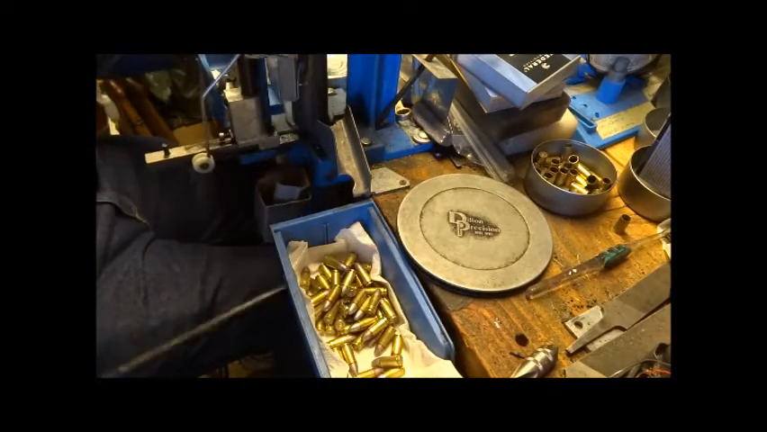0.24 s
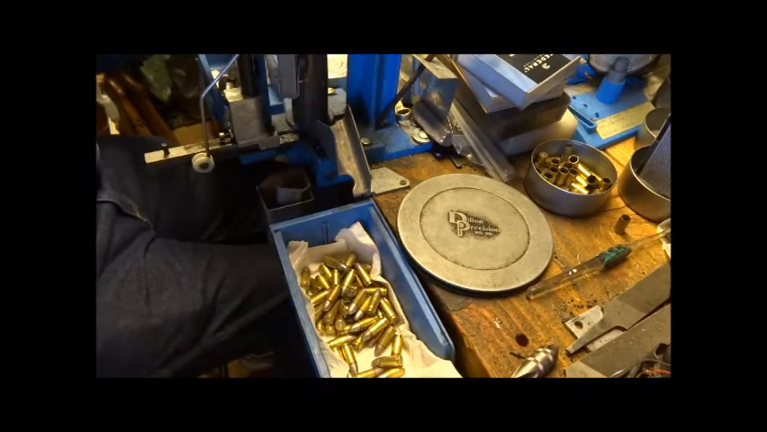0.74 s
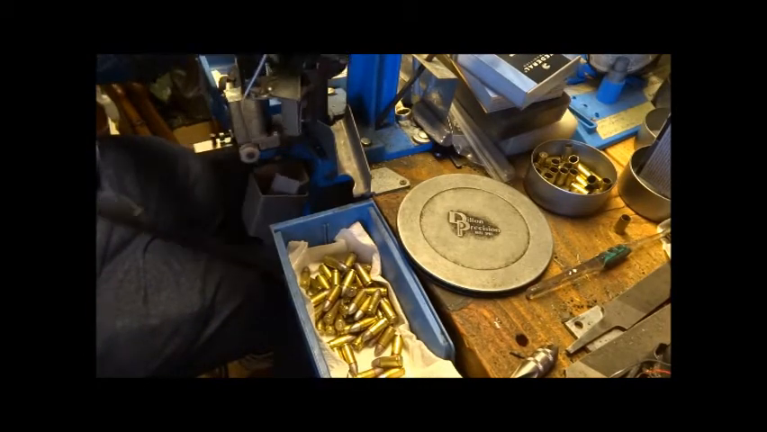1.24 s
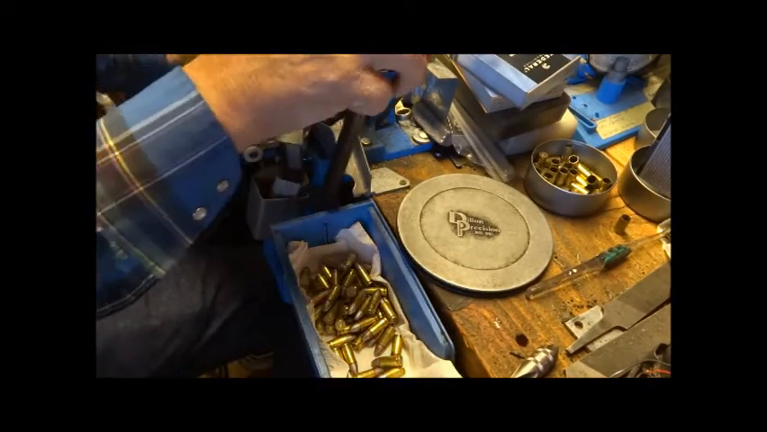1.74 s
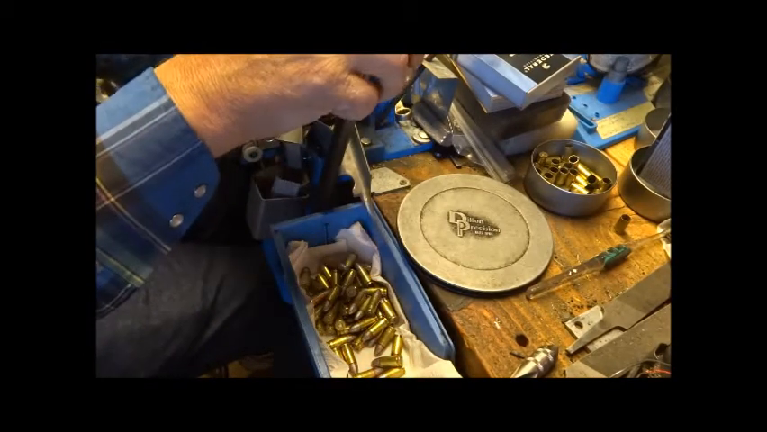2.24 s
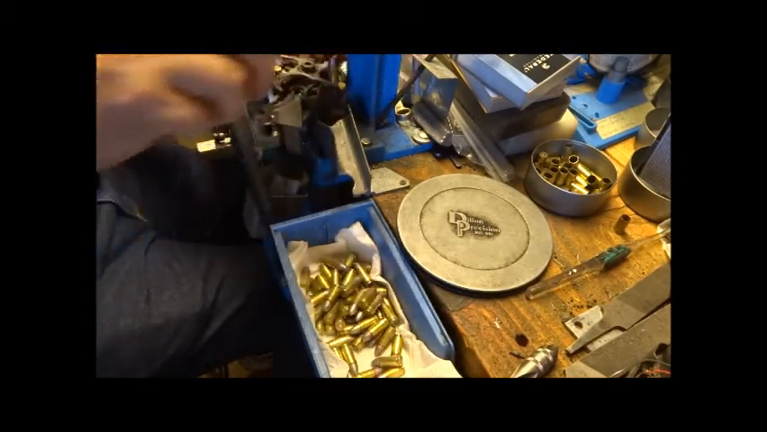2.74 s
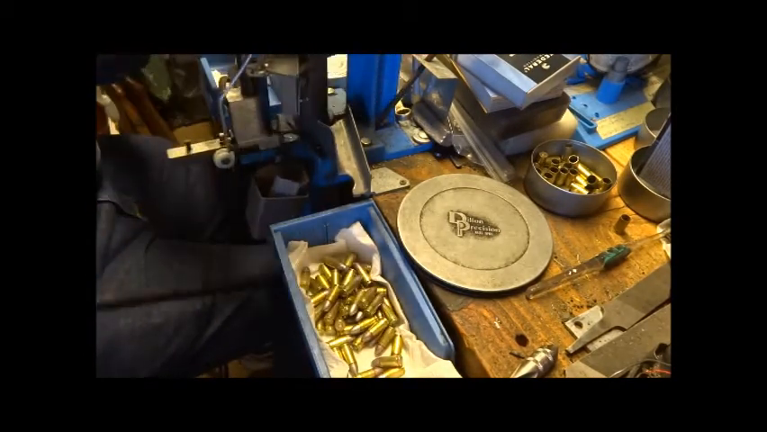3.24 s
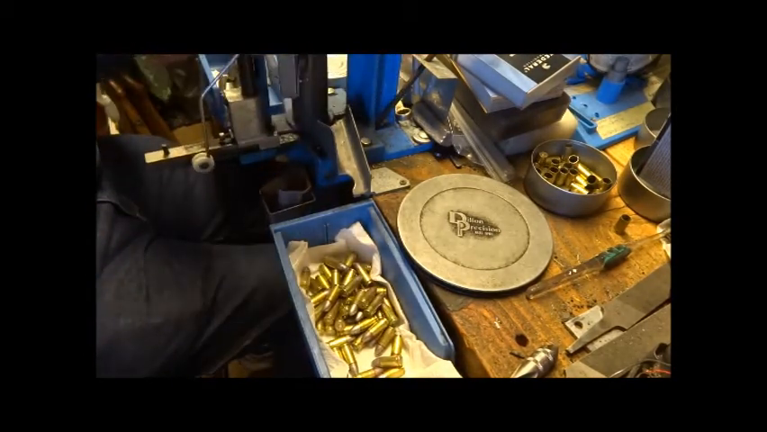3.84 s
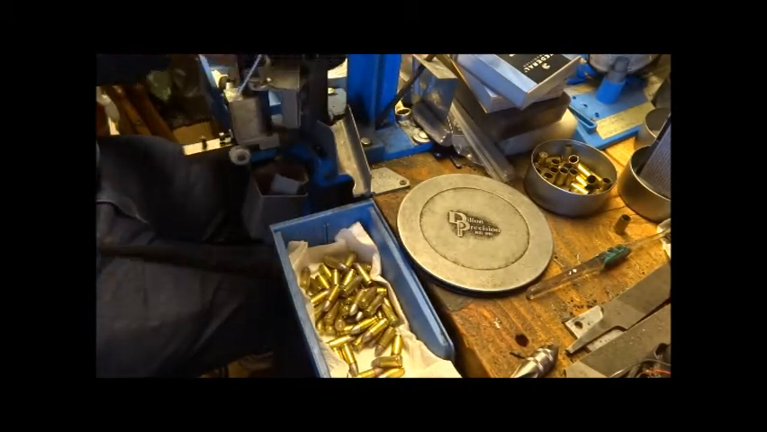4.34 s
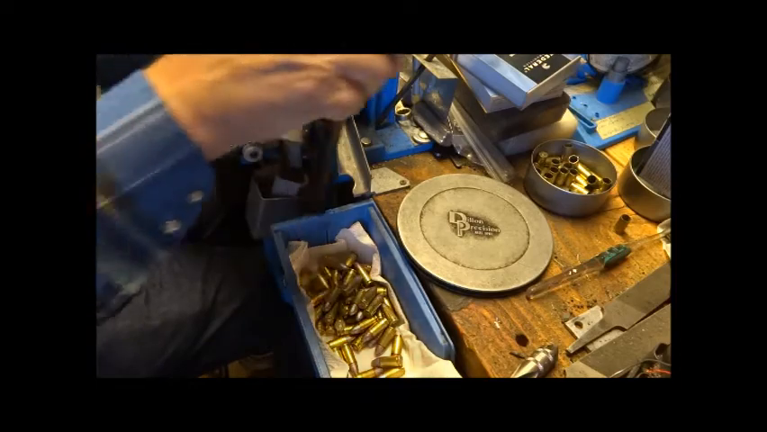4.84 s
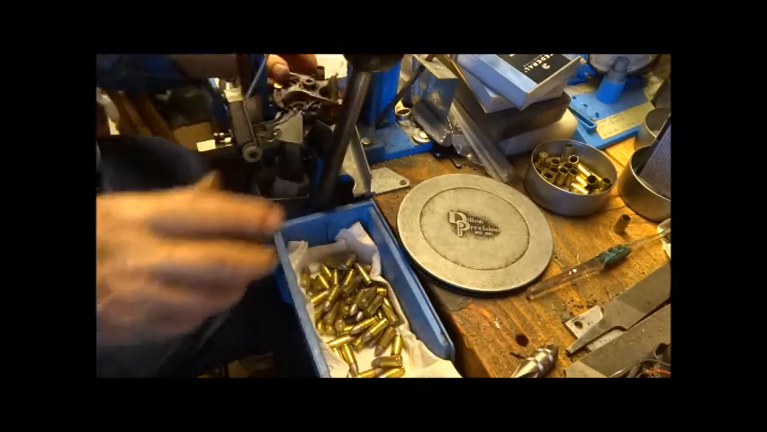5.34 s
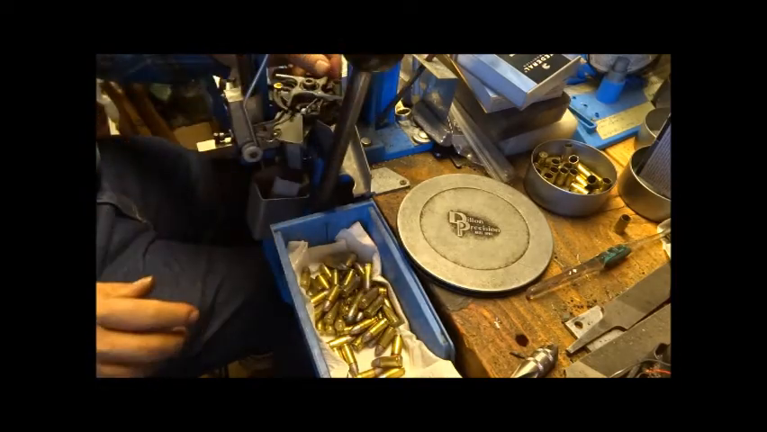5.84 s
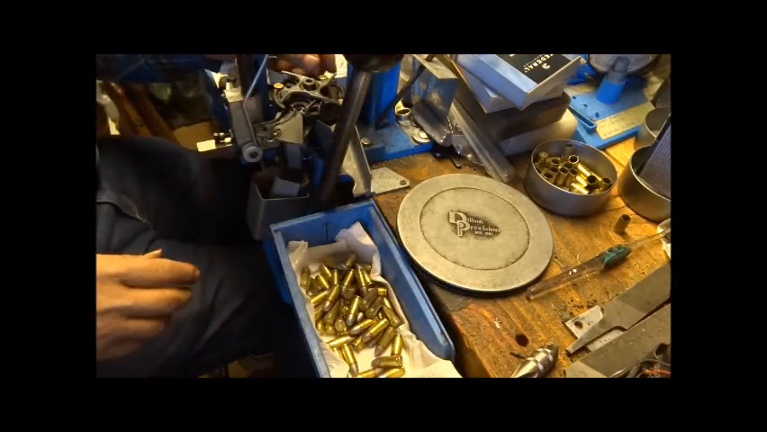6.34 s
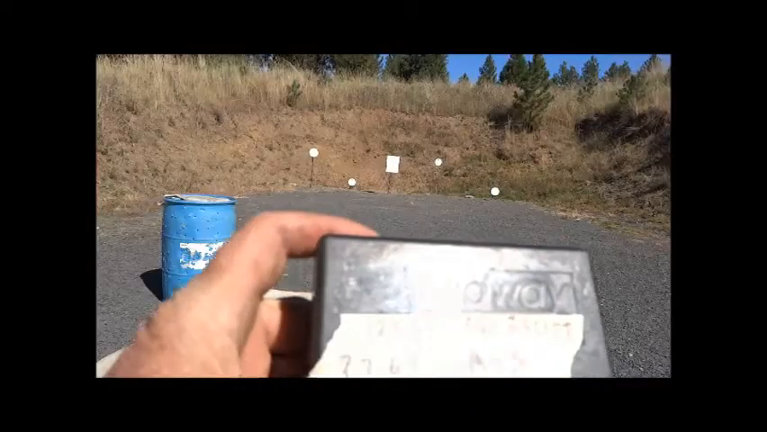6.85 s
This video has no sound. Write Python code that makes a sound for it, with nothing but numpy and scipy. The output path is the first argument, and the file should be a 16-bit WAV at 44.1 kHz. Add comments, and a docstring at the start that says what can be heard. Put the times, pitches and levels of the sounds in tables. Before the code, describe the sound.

A nearby stereo microphone catches a lever press at work: busy metallic knocks and rasping slides first, a sharp snap, small handling clicks, then a bright brass clatter with hollow bin knocks. After a lull, two heavier stroke clusters and a second snap lead to another cartridge drop. Faint indoor hiss and short wall reflections surround it, abruptly replaced by fading quiet open air.

```python
"""A hand press is worked at a wooden bench, close up: steel parts knock and click as noise bursts and dying
sines, the ram slides as gritty noise and sings through gliding resonances, and the bench thumps.
Twice a finished brass round tumbles ringing down a chute and drums on a hollow bin, each a bank of modes.
A faint shaped room hiss lies under the bench; at the end the scene changes to quiet open air, a fading hiss."""
import sys
import numpy as np
from scipy import signal
from scipy.fft import rfft, irfft
from scipy.io import wavfile
from scipy.ndimage import uniform_filter1d

SR = 44100
rng = np.random.default_rng(int(sys.argv[2]) if len(sys.argv) > 2 else 0)


def bounce(signal):
    """Save signal as a 16-bit WAV file at the path given by the first command-line argument."""
    frames = np.transpose(np.atleast_2d(signal))
    limited = np.clip(frames, -1, 1)
    pcm = np.round(limited * 32767).astype(np.int16)
    wavfile.write(sys.argv[1], SR, pcm)


def decibels_to_gain(level_db):
    """Convert a level in decibels to a linear amplitude gain (20 dB per decade)."""
    exponent = np.asarray(level_db, float) / 20
    return 10 ** exponent


N = 313551

# open air spectrum: (frequency [Hz], relative level [dB])
AIR_COLOUR = [(40, -29), (1060, -11.5), (1510, -18), (1840, -5), (2620, -14), (14900, -22), (16500, -12)]
# resonances in the air and room hiss: (frequency [Hz], width [Hz], level before a common offset [dB])
AIR_RESONANCES = [(2410, 81, -2)]
ROOM_RESONANCES = [(361, 44, 3), (958, 70, 3), (2270, 110, 3), (3810, 150, 4)]
# room hiss spectrum: (frequency [Hz], relative level [dB])
ROOM_COLOUR = [(30, -10.5), (120, -0.5), (300, -5.5), (700, 3), (1300, -6), (2600, -4), (4500, -7),
               (9000, -8.5), (15000, -9), (16500, -33.5)]
AIR_START_S = 6.668
# decay of the wall reflections: (frequency [Hz], t60 [s])
WALL_DECAY = [(150, 0.13), (1000, 0.09), (4000, 0.06), (14000, 0.03)]
# side gain of the bench sounds, then of the hisses: (frequency [Hz], gain [dB])
BENCH_SIDE = [(60, -18), (180, -25), (700, -21), (3000, -15), (6000, -16), (15000, -22)]
HISS_SIDE = [(100, -12), (400, -2), (1500, 1.5), (5000, -6), (15000, -7.5)]
# microphone response: (frequency [Hz], gain [dB])
MICROPHONE_COLOUR = [(30, -18), (110, -6), (200, 0), (12000, 0), (15500, -6), (17000, -28)]

# the sliding ram sings, its pitch moving as the free length changes:
# (start [s], end [s], first pitch [Hz], last pitch [Hz], level [dB])
RAM_WHINES = [(.14, 0.253, 5000, 6100, -43.5), (.29, 0.439, 6550, 6300, -38), (.11, .28, 4050, 3800, -48),
              (.3, 0.404, 14200, 13000, -30.5), (0.883, 1.048, 7600, 5800, -41.5)]
# slides of ram and cases, swelling toward the stop:
# (start [s], loudest [s], end [s], scrape level [dB], rumble relative to scrape [dB])
SLIDE_STROKES = [(-.05, 0.052, 0.16, -34.5, 0.5), (0.137, 0.378, 0.52, -31, -11.5),
                 (0.598, 0.665, 1.03, -53.5, 13), (0.927, 1.12, 1.24, -28, -13.5),
                 (3.54, 3.623, 3.82, -41.5, -6.5), (3.82, 3.897, 4, -54.5, 12),
                 (4.093, 4.13, 4.38, -38, -21.5), (4.203, 4.395, 4.62, -45.5, -4)]
# steady rubbing while a hand rests on the lever or moves cases: (start [s], end [s], level [dB])
HAND_RUBS = [(0.494, 1.802, -55), (2.042, 2.202, -53.5), (3.013, 4.08, -57), (4.483, 5.908, -55.5)]
# scrape and rumble spectra: (frequency [Hz], relative level [dB])
SCRAPE_COLOUR = [(880, -48), (1500, -27.5), (2430, -4), (5700, -1), (13400, -0.5), (15500, -4),
                 (16500, -28)]
BENCH_RUMBLE_COLOUR = [(60, -26), (150, -5.5), (500, -3), (1100, -6.5), (2500, -6.5), (5000, -23.5)]

# the lever loads the bench: (time [s], level [dB])
LEVER_THUMPS = [(0.041, -29), (0.263, -34), (0.354, -30), (0.591, -24), (0.712, -29.5), (0.855, -31.5),
                (0.905, -38), (1.056, -26.5), (1.107, -29.5), (1.175, -26), (1.78, -30.5), (1.981, -43),
                (2.06, -38.5), (2.377, -36), (3.732, -40.5), (3.546, -25), (3.818, -27), (3.937, -32),
                (4.02, -38), (4.085, -33), (4.188, -23.5), (5.006, -27), (5.114, -31.5), (5.134, -28),
                (5.21, -43), (5.562, -45)]
# deep modes of the bench top: (frequency [Hz], level [dB], t60 [s])
BENCH_TOP_MODES = [(182, -12.5, 0.24), (209, -6, 0.069), (303, -4.5, 0.03), (378.8, -7, 0.13)]
# modes of the press frame: (frequency [Hz], level [dB], t60 [s])
FRAME_MODES = [(418, -19, 0.044), (528.6, -0.5, 0.1), (637, 14, 0.058), (843, 7.5, 0.084),
               (1038.6, 12, 0.039), (1315, 8, 0.035)]

# the round drums on the bin: (time [s], level [dB])
BIN_LANDINGS = [(2.278, -11.5), (2.339, -18), (2.3762, -0.5), (2.396, -5), (2.453, -14), (5.788, -22.5),
                (5.826, -18.5), (5.8948, -2), (5.955, -13.5), (6.015, -23.5), (6.04, -25.5)]
# modes of the hollow bin: (frequency [Hz], level before dulling [dB], t60 [s])
BIN_MODES = [(505, -11, 0.05), (640, -1, 0.04), (790, -16, .08), (1030, 5, 0.03), (1135, 1, 0.03)]
# bounces of the falling round: (time [s], level [dB], tilt toward the high modes [dB per octave])
ROUND_BOUNCES = [(2.269, -22.5, 1.5), (2.279, -13, -5), (2.308, -18.5, -1), (2.339, -19, -5),
                 (5.7769, -18, 4), (5.79, -19, 4.5), (5.823, -22.5, 1.5), (5.8384, -29.5, 5.5),
                 (5.8463, -25, -4.5)]
# modes of the brass round: (frequency [Hz], level before tilt [dB], t60 [s])
BRASS_MODES = [(2090, -5, .07), (3615, -6, .13), (3920, -8, .08), (5558, -7, .08), (5592, -3, .1),
               (6300, -9, .07), (8100, -12, .05), (9960, -7, .12), (10070, -8, .12), (11200, -4, .07),
               (11760, -4, .09), (14460, -4, .1)]

# a tiny steel part's single mode: (frequency [Hz], level [dB], t60 [s])
PING_MODES = [(11250, -18, .07)]
# modes of a light loose part: (frequency [Hz], level [dB], t60 [s])
LOOSE_MODES = [(1780, -9.5, 0.22), (2640, -9.5, 0.07), (3060, -1, 0.081), (3500, -7, 0.088),
               (4470, -10, 0.096), (6100, -1.5, 0.054), (6600, -7, 0.035)]
# taps on the loose part: (time [s], level [dB])
LOOSE_PART_TAPS = [(.703, -45), (0.733, -31), (0.752, -47), (.772, -33), (.849, -47)]
# modes of the turning plate: (frequency [Hz], level before tilt [dB], t60 [s])
PLATE_MODES = [(823, -2, 0.044), (1084, -5, 0.046), (1520, -2, 0.04), (1758, -9, 0.09),
               (2130, -12.5, 0.092), (3380, -3.5, 0.054), (4040, -8, 0.038)]
# the plate snaps into place and rebounds: (time [s], level [dB], tilt toward the high modes [dB per octave])
SNAPS = [(1.394, -10.5, -8.5), (1.451, -32, 15.5), (4.568, -11, -2), (4.629, -34, 15)]
# the round hits chute, bin and other rounds:
# (time [s], level [dB], treble before a common trim [dB], strongest resonance [Hz])
ROUND_HITS = [(2.2693, -15.5, 2.5, 3750), (2.2783, -4.5, -9.5, 5600), (2.308, -5, -3.5, 5900),
              (2.339, -3.5, -9.5, 5600), (2.375, -4.5, -20, 2090), (2.395, -7, -20.5, 2200),
              (2.4533, -16.5, 4.5, 5220), (2.4582, -29.5, 11, 6410), (2.4665, -30, 12, 9100),
              (2.516, -36, 7.5, 3310), (2.53, -39.5, 4.5, 3260), (5.7785, -13.5, 3, 5650),
              (5.7916, -16, 2, 3726), (5.8251, -7.5, 0.5, 2080), (5.8387, -14.5, 2.5, 3750),
              (5.8457, -9.5, -4.5, 7800), (5.895, -15.5, -17, 2135), (5.9576, -16.5, 4, 7100),
              (5.9616, -30, 13, 6430), (5.966, -30, 12, 7540), (5.999, -37.5, 15, 6000),
              (6.0159, -26, 8, 6800), (6.0412, -41.5, 7, 6400), (6.0537, -36.5, 12.5, 6190)]
# steel knocks and clicks of the press:
# (time [s], level [dB], treble before a common trim [dB], strongest resonance [Hz])
STEEL_KNOCKS = [(0.0328, -8.5, -4.5, 4730), (0.0423, -5, -16.5, 1910), (0.0925, -18, -22, 2340),
                (0.2497, -21, -8, 5200), (0.3312, -17.5, -3.5, 6560), (0.358, -20, -9.5, 2400),
                (0.4158, -15, -7.5, 6100), (0.46, -28, 2, 6100), (0.4772, -17, -22.5, 2860),
                (0.495, -29, 0, 4900), (0.504, -31, 0, 4900), (0.5145, -29, 1, 4800), (0.525, -30, 0, 4930),
                (0.5903, -18.5, -16, 2210), (0.6057, -17, -14, 2370), (0.621, -17, 2, 4540),
                (0.634, -12, -3.5, 3000), (0.717, -19, -15, 2730), (0.73, -32.5, -4, 4360),
                (0.8575, -17, -28, 1300), (0.8972, -28.5, -1, 7600), (1.0519, -16.5, -18.5, 2660),
                (1.067, -12.5, -19, 1360), (1.1105, -9, 1, 6700), (1.1162, -5.5, -19.5, 2420),
                (1.1605, -16, 2.5, 4500), (1.1627, -10, 0, 4300), (1.3948, -10.5, -4, 4770),
                (1.453, -15, -1, 4040), (1.5556, -19.5, -7.5, 3180), (1.566, -17.5, -1, 2890),
                (1.7812, -22, -11, 1590), (2.0563, -39, 8, 1510), (2.0917, -27.5, -12.5, 5200),
                (2.1929, -16, 0.5, 4900), (2.226, -24.5, -28, 1300), (2.6626, -29, -9, 3770),
                (2.677, -36, 8, 5400), (2.6825, -30, 6, 4800), (2.713, -37, 6, 3000),
                (2.903, -19, 0.5, 3670), (3.032, -27, -3.5, 3300), (3.103, -18.5, -0.5, 3140),
                (3.4755, -28, 2.5, 4830), (3.5226, -11.5, -1.5, 4600), (3.5412, -16, 2, 4900),
                (3.548, -5, -14, 1900), (3.602, -24, -12, 1510), (3.6416, -21, -12.5, 2820),
                (3.7283, -33.5, -15.5, 1560), (3.8311, -16.5, -17.5, 2860), (3.844, -16, -3, 4200),
                (3.875, -29.5, -0.5, 4350), (3.9253, -30, 0, 3000), (3.9395, -24, -25, 1830),
                (4.0846, -30, -11, 1470), (4.1767, -11, 1, 5210), (4.1916, -5.5, -22, 2460),
                (4.249, -13, -7, 4170), (4.568, -8.5, -5, 4600), (4.6291, -15.5, -0.5, 4040),
                (4.7383, -19.5, -11, 3200), (4.7507, -15, -2.5, 4730), (4.805, -31.5, -7, 3170),
                (5.008, -19.5, -9.5, 1880), (5.116, -29.5, -13.5, 1520), (5.1341, -24.5, -17.5, 1520),
                (5.3117, -43, 4.5, 3750), (5.5607, -33.5, 4, 1660), (5.7055, -12, 5.5, 7220),
                (6.1404, -43, 0.5, 3650)]


def evened(x):
    """Scales to rms 1."""
    return x / np.sqrt(np.mean(x ** 2) + 1e-20)


def read(points, hz):
    """Reads a spectrum on a log-frequency axis."""
    f, value = np.transpose(points)
    return np.interp(np.log(hz + 1), np.log(f + 1), value)


def colour(x, points):
    """Filters x by a spectrum in dB."""
    gain = decibels_to_gain(read(points, np.fft.rfftfreq(len(x), 1 / SR)))
    return irfft(rfft(x) * gain, len(x))


def add(mix, s, sound):
    """Mixes a sound in at time s."""
    part = mix[round(s * SR):][:len(sound)]
    part += sound[:len(part)]


def rise(t, seconds):
    """Soft onset: energy builds up with this time constant."""
    return 1 - np.exp(-t / seconds)


def tilted(modes, db_per_octave, pivot_hz):
    """Tips the mode levels around a pivot, as a harder or softer blow does."""
    return [(hz, db + db_per_octave * np.log2(hz / pivot_hz), t60) for hz, db, t60 in modes]


def ring(modes, spread_db, detune, rough_db, t):
    """Dying sines; where the blow lands changes share and pitch of each mode, loose contact roughens it."""
    hz, db, t60 = np.transpose(modes)[:, :, None]
    share, turn = rng.standard_normal((2, len(modes), 1))
    loose = evened(uniform_filter1d(rng.standard_normal((len(modes), len(t))), size=180, axis=1))
    level = decibels_to_gain(db + spread_db * share + rough_db * loose - 60 * t / t60)
    return (level * np.sin(2 * np.pi * hz * (1 + detune * turn) * t)).sum(0)


def hiss(points, peaks, peak_db, patchy_db):
    """Random short-time spectra with drifting patches and a few resonances, at rms 1."""
    frames, hz = N // 256 + 5, np.fft.rfftfreq(1024, 1 / SR)[:, None]
    a, b, patches = rng.standard_normal((frames, 513, 3)).T
    patches = uniform_filter1d(patches, size=12, axis=0)
    patches = evened(uniform_filter1d(patches, size=14, axis=1))
    bumps = sum(decibels_to_gain(db + peak_db) / (1 + (2 * (hz - f) / width) ** 2) for f, width, db in peaks)
    z = (a + 1j * b) * decibels_to_gain(read(points, hz) + patchy_db * patches) * (1 + bumps)
    return evened(signal.istft(z, nperseg=1024, noverlap=768)[1][:N])


def open_air():
    """Quiet outdoor hiss, sinking steadily."""
    t = np.arange(N) / SR
    level_db = -56.5 - 5.5 * (t - 8.0)  # sinks 5.5 dB per second
    return decibels_to_gain(level_db) * hiss(AIR_COLOUR, AIR_RESONANCES, peak_db=-9, patchy_db=1.5)


def room_hiss():
    """Faint steady noise of the room, with a few resonances."""
    return decibels_to_gain(-56.5) * hiss(ROOM_COLOUR, ROOM_RESONANCES, peak_db=4.5, patchy_db=1.0)


def taps(start, points):
    """Sparse echoes of random sign, one in every 20 samples, each band dying at its own speed."""
    sparse = np.zeros(SR // 2)
    at = np.arange(start, SR // 2 - 20, 20)
    sparse[at + rng.integers(0, 20, len(at))] = rng.choice([-1., 1.], len(at))
    hz, t, z = signal.stft(sparse, SR, nperseg=256)
    tail = signal.istft(z * decibels_to_gain(-60 * t / read(points, hz)[:, None]), SR, nperseg=256)[1]
    return tail / np.linalg.norm(tail)


def whines():
    """The ram sings: gritty noise through a narrow resonance that glides."""
    out = np.zeros(N)
    width_share = 0.11  # width of the resonance over its first pitch
    for start, end, first_hz, last_hz, db in RAM_WHINES:
        u = np.linspace(0, 1, round((end - start) * SR))
        smooth = signal.butter(2, width_share * first_hz / 2, fs=SR, output="sos")
        a, b = signal.sosfilt(smooth, rng.standard_normal((2, len(u))))
        turn = 2 * np.pi * np.cumsum(first_hz + (last_hz - first_hz) * u) / SR
        tone = evened(a * np.cos(turn) + b * np.sin(turn))
        add(out, start, decibels_to_gain(db) * tone * np.sqrt(np.sin(np.pi * u).clip(0)))
    return out


def slide():
    """Dense uneven micro-slips of metal on metal, and the rumble they send into the bench."""
    t = np.arange(N) / SR
    scrape_power, rumble_power = np.zeros(N), np.zeros(N)
    rubs = [(start, start, end, db, -3.5) for start, end, db in HAND_RUBS]
    for start, top, end, db, rumble_db in SLIDE_STROKES + rubs:
        swell_db = np.interp(t, [start, top, end], [-10, 0, -15]) if top > start else 0
        edges = np.clip(np.minimum(t - start, end - t) / 0.053 + 1, 0, 1)  # 53 ms fades outside the stroke
        power = (decibels_to_gain(db + swell_db) * edges) ** 2
        scrape_power = scrape_power + power
        rumble_power = rumble_power + power * decibels_to_gain(2 * rumble_db)
    grit = decibels_to_gain(3.0 * evened(uniform_filter1d(rng.exponential(1, N) - 1, size=25)))
    scrape = evened(grit * hiss(SCRAPE_COLOUR, [], peak_db=0, patchy_db=3.0))
    rumble = hiss(BENCH_RUMBLE_COLOUR, [], peak_db=0, patchy_db=2.0)
    return scrape * np.sqrt(scrape_power) + rumble * np.sqrt(rumble_power)


def thumps():
    """The lever loads the bench top, whose deep modes swell and die, and the frame answers."""
    out, t = np.zeros(N), np.arange(6144) / SR
    for s, db in LEVER_THUMPS:
        top = ring(BENCH_TOP_MODES, spread_db=1.5, detune=0.07, rough_db=7.0, t=t)
        add(out, s, decibels_to_gain(db) * top * rise(t, 0.013))
        frame = ring(FRAME_MODES, spread_db=2.5, detune=0.1, rough_db=5.5, t=t)
        add(out, s, decibels_to_gain(1.5 * db + 3) * frame * rise(t, 0.006))  # a soft thump hardly rings the frame
    return out


def bin_drumming():
    """The hollow bin booms in its low modes under each landing, with a crunch of shuffling rounds."""
    out, t = np.zeros(N), np.arange(8192) / SR
    hollow = signal.butter(2, [520, 2600], "bandpass", fs=SR, output="sos")
    for s, db in BIN_LANDINGS:
        dull_db_per_octave = 0.8 * db  # soft taps miss the high modes
        modes = [(hz, mode_db + dull_db_per_octave * max(np.log2(hz / 650), 0), t60)
                 for hz, mode_db, t60 in BIN_MODES]
        boom = ring(modes, spread_db=1.0, detune=0.008, rough_db=2.5, t=t)
        crunch = signal.sosfilt(hollow, rng.standard_normal(len(t))) * decibels_to_gain(-10 - 60 * t / 0.1)
        add(out, s, decibels_to_gain(db) * (boom + crunch) * rise(t, 0.0025))
    return out


def brass_round():
    """The falling round rings anew in its modes at each bounce, roughened as it tumbles."""
    out, t = np.zeros(N), np.arange(8192) / SR
    next_times = [row[0] for row in ROUND_BOUNCES[1:]] + [np.inf]
    for (s, db, tilt_db), following in zip(ROUND_BOUNCES, next_times):
        # the next contact damps the ring; it is damped after 65 ms in any case
        damped_db = -900 * np.maximum(t - min(following - s, 0.065), 0)
        modes = tilted(BRASS_MODES, tilt_db, pivot_hz=5600)
        add(out, s, decibels_to_gain(db + damped_db) * ring(modes, spread_db=2.5, detune=0.002, rough_db=3, t=t))
    return out


def small_parts():
    """A tiny steel part pings once in one mode; a light loose part rattles and sings at each tap."""
    out, t = np.zeros(N), np.arange(6144) / SR
    add(out, 1.1998, ring(PING_MODES, spread_db=0, detune=0, rough_db=1, t=t))
    for s, db in LOOSE_PART_TAPS:
        add(out, s, decibels_to_gain(db) * ring(LOOSE_MODES, spread_db=0.0, detune=0.0023, rough_db=5.5, t=t))
    return out


def plate():
    """The turning plate snaps into place and rebounds, ringing in its modes."""
    out, t = np.zeros(N), np.arange(6144) / SR
    for s, db, tilt_db in SNAPS:
        modes = tilted(PLATE_MODES, tilt_db, pivot_hz=1500)
        add(out, s, decibels_to_gain(db) * ring(modes, spread_db=1.5, detune=0.01, rough_db=5.5, t=t) * rise(t, 0.006))
    return out


def frame_thud(rattle, db, hz, t):
    """The blow shakes the press frame: its modes ring over the low part of the rattle."""
    low = signal.butter(2, [450, 2200], "bandpass", fs=SR, output="sos")
    frame = ring(FRAME_MODES, spread_db=5.5, detune=0.053, rough_db=6.5, t=t)
    frame = frame + signal.sosfilt(low, rattle) * decibels_to_gain(11.0)
    # relative to the knock: low-pitched parts and hard blows shake the frame most
    thud_db = -17 - 7 * max(np.log2(hz / 2210), 0) + 0.94 * db
    return frame * decibels_to_gain(thud_db) * rise(t, 0.0062)


def knock(db, treble_db, hz, on_frame):
    """A short crack and a dense steel rattle coloured by the struck part, with a thud if on the frame."""
    t = np.arange(6144) / SR
    # bright parts die sooner than dull ones, hard blows rattle longer than light ticks
    t60 = np.clip(0.12 - 0.0012 * treble_db + 0.001 * (db + max(treble_db, 0)), 0.035, 0.15)
    chatter = decibels_to_gain(3.5 * evened(uniform_filter1d(rng.standard_normal(len(t)), size=60)))  # loose parts rebound
    crack = 3.6 * decibels_to_gain(0.25 * np.clip(treble_db, -20, 14) - 60 * t / 0.005)  # bright parts crack sharpest
    rattle = rng.standard_normal(len(t)) * (crack + chatter * decibels_to_gain(-60 * t / t60))
    part = signal.lfilter(*signal.iirpeak(hz, 11, SR), rattle)  # close modes of the part merge into one hump
    edge_hz = max(6500 * decibels_to_gain(0.22 * min(treble_db, 0)), 2500)  # dull knocks lose their upper middle too
    middle = signal.butter(2, [1250, edge_hz], "bandpass", fs=SR, output="sos")
    steel = signal.sosfilt(middle, rattle) * decibels_to_gain(-8.5) + part * decibels_to_gain(-1.0)
    glints = sum(signal.lfilter(*signal.iirpeak(f, 25, SR), rattle) for f in rng.uniform(6000, 14500, 3))
    rattle = rattle + 2 * glints
    treble = signal.butter(3, 5800, "highpass", fs=SR, output="sos")
    bright = signal.sosfilt(treble, rattle) * decibels_to_gain(treble_db - 8.0)
    thud = frame_thud(rattle, db, hz, t) if on_frame else 0
    return decibels_to_gain(db) * (steel + bright + thud)


def round_hits():
    """The tumbling round strikes other parts: steel-like knocks without the frame."""
    out = np.zeros(N)
    for s, db, treble_db, hz in ROUND_HITS:
        add(out, s, knock(db, treble_db, hz, on_frame=False))
    return out


def press():
    """The working press: knocks of its steel parts, each shaking the frame."""
    out = np.zeros(N)
    for s, db, treble_db, hz in STEEL_KNOCKS:
        add(out, s, knock(db, treble_db, hz, on_frame=True))
    return out


def scene():
    """Bench sounds with their room, then open air; two close ports hear nearly the same."""
    indoors = np.arange(N) / SR < AIR_START_S
    struck = press() + small_parts() + plate() + round_hits() + brass_round() + bin_drumming()
    no_bass = signal.butter(3, 310, "highpass", fs=SR, output="sos")  # small parts radiate no bass
    bench = signal.sosfilt(no_bass, struck) + thumps() + slide() + whines()
    room_mid, room_side = room_hiss(), room_hiss()
    air_mid, air_side = open_air(), open_air()
    wet = bench + decibels_to_gain(-13.0) * signal.fftconvolve(bench, taps(150, WALL_DECAY))[:N]
    # nearby objects reach each port differently
    scattered = signal.fftconvolve(wet, taps(4, [(100, 0.08), (15000, 0.05)]))[:N]
    bench_side = colour(scattered, BENCH_SIDE) + colour(room_side, HISS_SIDE)
    mid = np.where(indoors, wet + room_mid, air_mid)
    side = np.where(indoors, bench_side, colour(air_side, HISS_SIDE))
    return np.array([mid + side, mid - side])


def low_pass(x):
    """Removes everything above the highest recorded frequency."""
    return signal.sosfilt(signal.butter(12, 16820, fs=SR, output="sos"), x)


def record(dry):
    """A soft ceiling rounds the loudest peaks, then the microphone colours the sound."""
    limited = 1.2 * np.tanh(dry / 1.2)
    heard = np.array([colour(channel, MICROPHONE_COLOUR) for channel in limited])
    mix = np.clip(heard, -1, 1)
    return low_pass(mix)


dry = scene()
out = record(dry)
bounce(out)
```